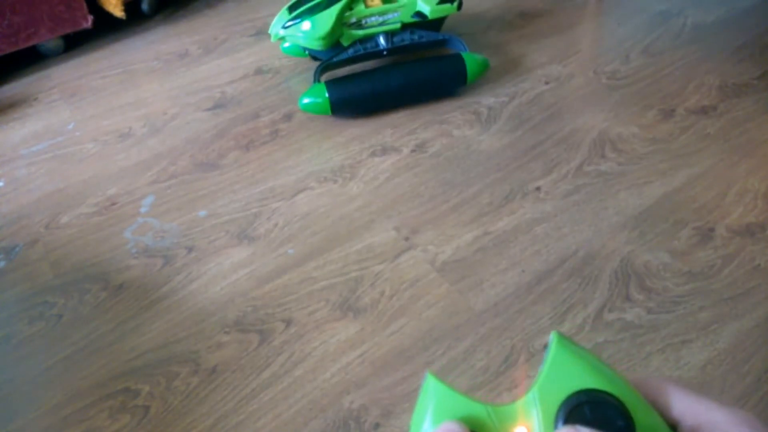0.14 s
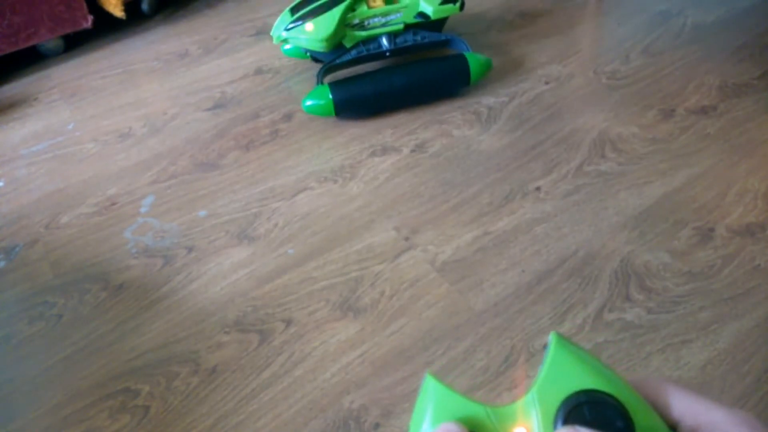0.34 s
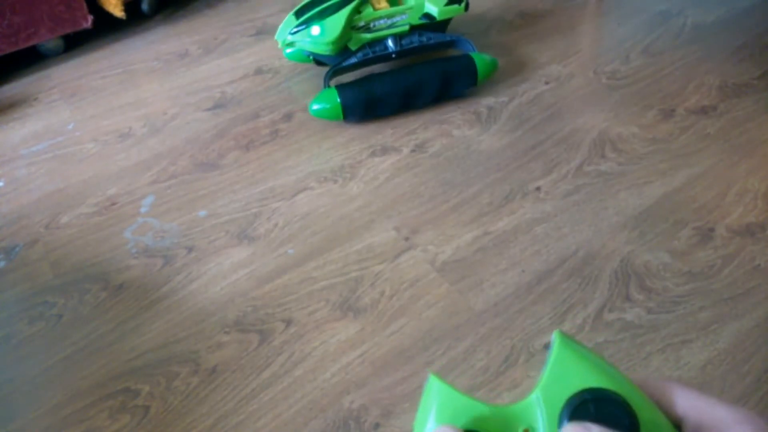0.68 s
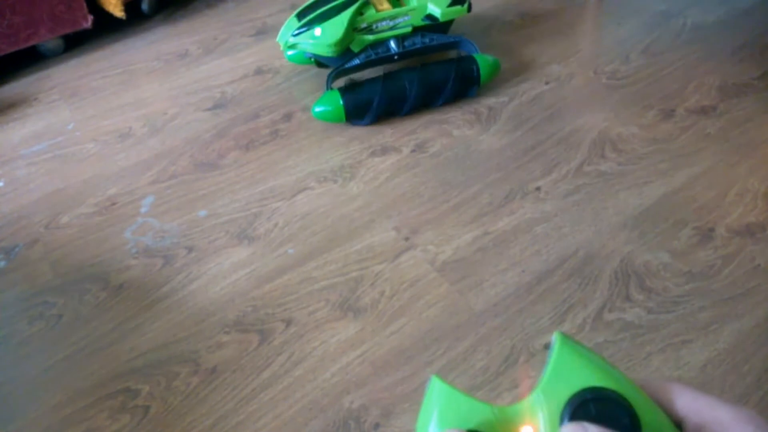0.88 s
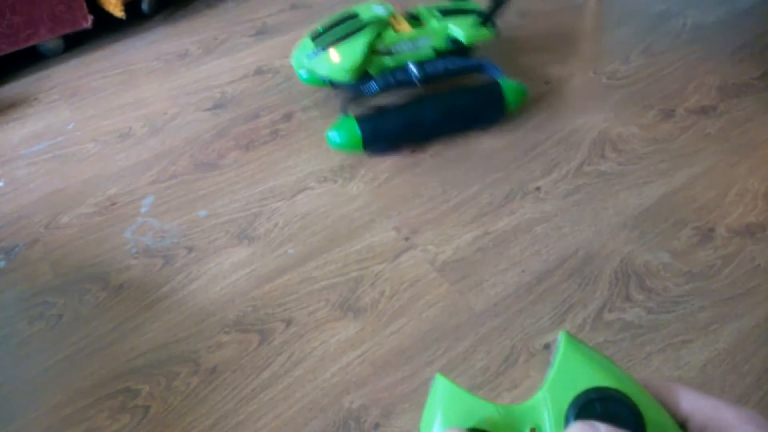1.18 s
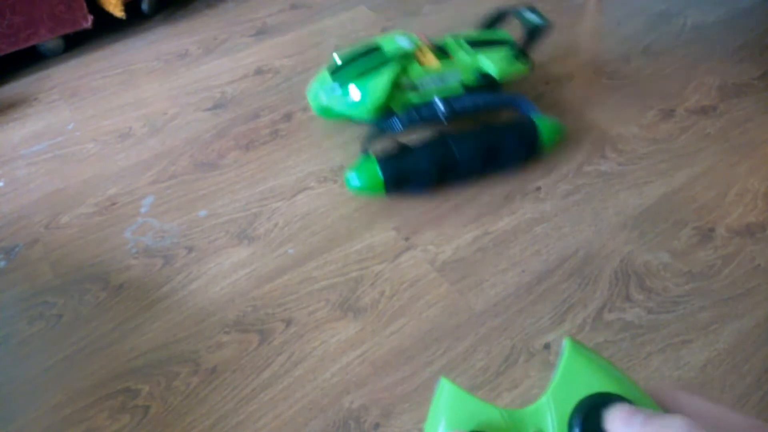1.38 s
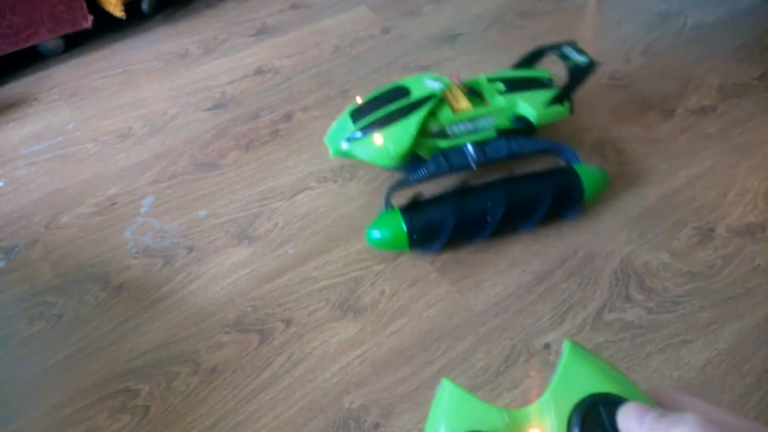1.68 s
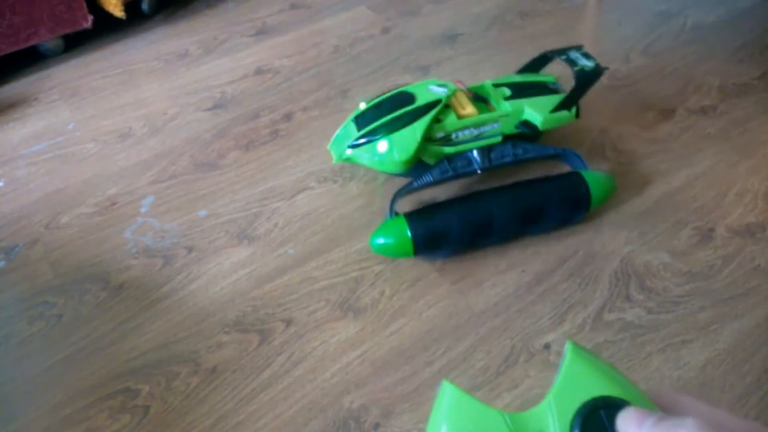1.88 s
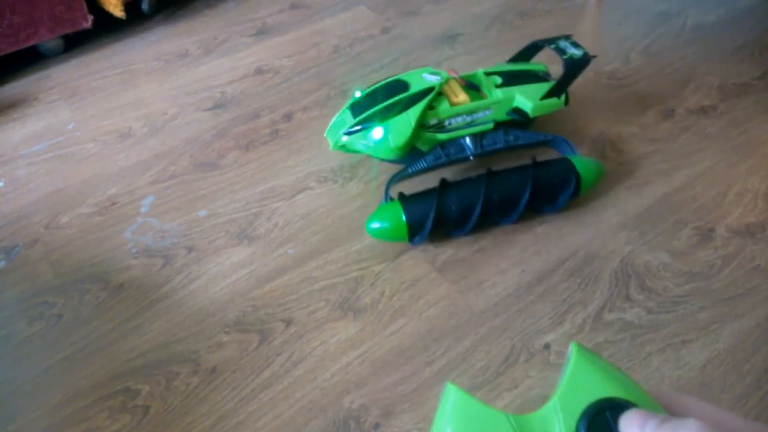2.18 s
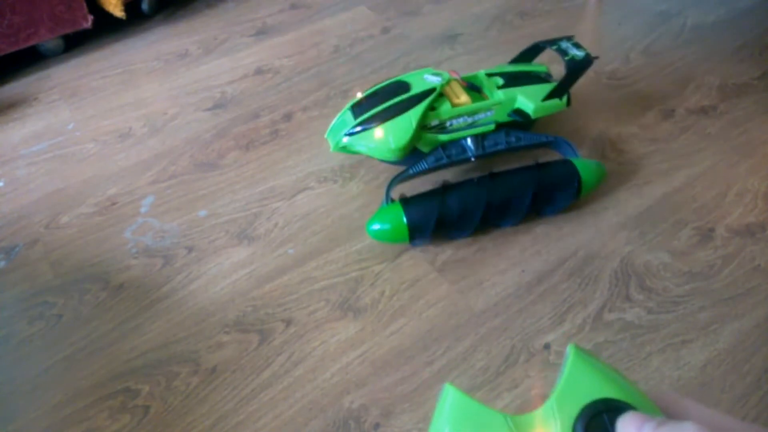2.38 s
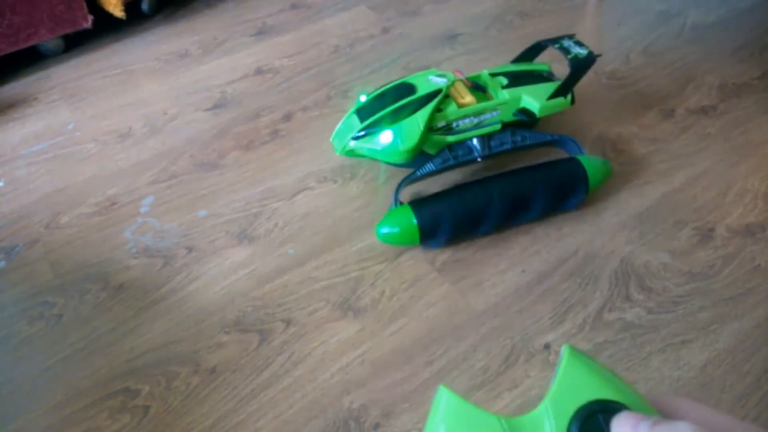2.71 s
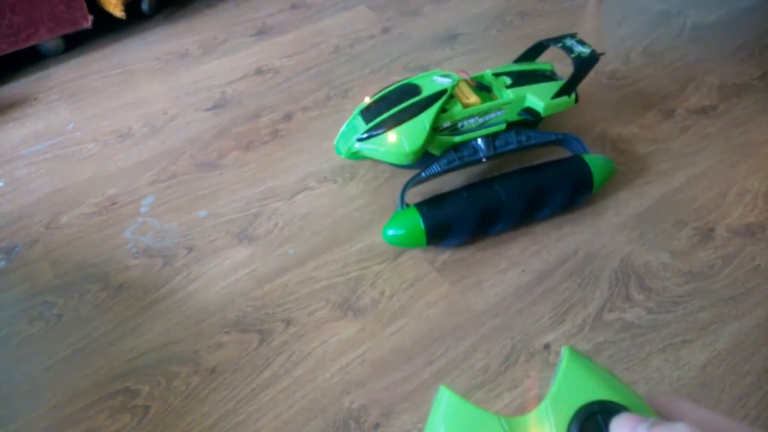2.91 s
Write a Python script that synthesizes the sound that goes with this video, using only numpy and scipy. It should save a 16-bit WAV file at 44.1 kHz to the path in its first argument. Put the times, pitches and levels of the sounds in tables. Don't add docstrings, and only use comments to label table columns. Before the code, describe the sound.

A battery toy car rattles and whirs across a wooden floor in four bursts, its hollow drums knocking the boards; loud plastic switch snaps from a hand controller sound close to the microphone in a small room.

```python
import sys
import numpy as np
from scipy import signal
from scipy.fft import rfft, irfft
from scipy.io import wavfile

SR = 44100
rng = np.random.default_rng(int(sys.argv[2]) if len(sys.argv) > 2 else 0)


def int16_out(signal):
    q = np.round(np.clip(np.atleast_2d(signal).T, -1, 1) * 32767)
    wavfile.write(sys.argv[1], SR, q.astype(np.int16))


def rack_gain(trim_db):
    fader = np.asarray(trim_db, float)
    return 10 ** (fader / 20)


N = 134505


def rms_one(x):
    return x / np.sqrt(np.mean(x ** 2) + 1e-20)


def colour(x, points):
    hz, db = np.transpose(points)
    grid = np.maximum(np.fft.rfftfreq(N, 1 / SR), 1)
    return irfft(rfft(x) * rack_gain(np.interp(np.log(grid), np.log(hz), db)), N)


def highpass(x, order, hz):
    return signal.sosfilt(signal.butter(order, hz, "high", fs=SR, output="sos"), x)


def band(x, edges_hz):
    return signal.sosfilt(signal.butter(2, edges_hz, "band", fs=SR, output="sos"), x)


def shelf(x, hz, gain_db):
    low = signal.sosfilt(signal.butter(2, hz, fs=SR, output="sos"), x)
    return low + rack_gain(gain_db) * (x - low)


def curves(rows):
    s, *controls = np.transpose(rows)
    return [np.interp(np.arange(N) / SR, s, control) for control in controls]


def drift(rate):
    r = np.exp(-2 * np.pi * rate / SR)
    walk = signal.lfilter([1], [1, -2 * r, r * r], rng.standard_normal(N + SR))[SR:]
    return 2 * np.tanh(rms_one(walk) / 2)


def impulses(seconds, heights):
    starts = np.full(N, 1e-18)
    starts[(np.array(seconds) * SR).astype(int)] = heights
    return starts


def surges(rows, fade_s):
    rise_s = 0.0025
    s, db = np.transpose(rows)
    fading = signal.lfilter([1], [1, -np.exp(-1 / (fade_s * SR))], impulses(s, db))
    rise = np.exp(-1 / (rise_s * SR))
    return signal.lfilter([1 - rise], [1, -rise], fading)


def grains(per_s, spread_db):
    size = rack_gain(spread_db * np.minimum(rng.exponential(1, N), 5)) * rng.choice([-1, 1], N)
    return rms_one(size * (rng.random(N) < per_s / SR))


def puffs(seconds, db, t60, low_hz):
    starts = impulses(seconds, rack_gain(db))
    decay = signal.lfilter([1], [1, -rack_gain(-60 / (t60 * SR))], starts)
    return highpass(decay * rng.standard_normal(N), 2, low_hz)


def resonate(x, peaks, patchy_db):
    out = 0
    for k, (hz, width_hz, db) in enumerate(peaks):
        r = np.exp(-np.pi * width_hz / SR)
        poles = [1, -2 * r * np.cos(2 * np.pi * hz / SR), r * r]
        ring = signal.lfilter([(1 - r * r) / 2, 0, (r * r - 1) / 2], poles, x)
        out = out + (-1) ** k * rack_gain(db + patchy_db * drift(15.5)) * ring
    return out


def strike(seconds, db, modes, colours_db):
    out = 0
    for (hz, level_db, t60), colour_db in zip(modes, np.transpose(colours_db)):
        clicks = impulses(seconds, rack_gain(db + level_db + colour_db) * rng.choice([-1, 1], len(db)))
        r, w = rack_gain(-60 / (t60 * SR)), 2 * np.pi * hz / SR
        out = out + signal.lfilter([0, np.sin(w)], [1, -2 * r * np.cos(w), r * r], clicks)
    return out


def room(x):
    t60_s, wall_cut_hz = 0.3, 10400
    t = np.arange(SR // 2) / SR
    tail = rng.standard_normal(len(t)) * rack_gain(-60 * t / t60_s) * (t > .004)
    tail = signal.sosfilt(signal.butter(1, wall_cut_hz, fs=SR, output="sos"), tail)
    return signal.fftconvolve(x, tail / np.sqrt(np.sum(tail ** 2)))[:N]


def shifting_room(x, count=9):
    place = np.linspace(0, count - 1, N)
    out = 0
    for k in range(count):
        nearness = np.clip(1 - abs(place - k), 0, 1)
        out = out + room(x * np.sin(np.pi / 2 * nearness))
    return out


def still_air():
    # f/Hz, level/dB
    air = [(30, -12.5), (100, -15), (300, -8), (1000, -19), (3000, -21), (5500, -24.5), (7500, -24.5),
           (16000, -20)]
    return rack_gain(-64.5 + 1.0 * drift(12)) * rms_one(colour(rng.standard_normal(N), air))


def thin_rasp():
    # t/s, f/Hz, half bandwidth/Hz, level/dB, fade/s
    rasp_settings = (0, 5050, 200, -63, 7)
    s, hz, width_hz, db, fade_s = rasp_settings
    since = np.arange(N) / SR - s
    rasp = rms_one(band(rng.standard_normal(N), [hz - width_hz, hz + width_hz]))
    fade = np.clip(since / .01, 0, 1) * np.exp(-np.maximum(since, 0) / fade_s)
    return rack_gain(db + 2.5 * drift(30)) * fade * rasp


def rough_tone(hz):
    width_hz = 110
    phase = 2 * np.pi * np.cumsum(hz) / SR
    return rms_one(drift(width_hz) * np.cos(phase) + drift(width_hz) * np.sin(phase))


def coasting():
    # t/s, low f/Hz, high f/Hz, level/dB
    glide = [(1.379, 1500, 2750, -66), (1.428, 1520, 2700, -50), (1.501, 1460, 2550, -46),
             (1.561, 1330, 2600, -45), (1.598, 1300, 2780, -51), (1.64, 1380, 2480, -49.5),
             (1.689, 1420, 2500, -42.5), (1.748, 1380, 2450, -51), (1.81, 1300, 2500, -53)]
    low_hz, high_hz, db = curves(glide)
    t = np.arange(N) / SR
    sounding = (t > glide[0][0]) * (t < glide[-1][0])
    return rack_gain(db) * sounding * (rough_tone(low_hz) + rack_gain(-6.5) * rough_tone(high_hz))


def ticks():
    # t/s, peak level/dB, low f/Hz, high f/Hz
    tick_rows = [(0.141, -19, 8500, 16000), (1.035, -20, 4800, 10500), (1.063, -16, 8500, 15000),
                 (1.217, -15, 8500, 15000), (1.305, -25, 8500, 15000), (1.518, -24, 3700, 7000),
                 (1.705, -30, 4300, 7600), (1.815, -35, 4000, 9000), (2.055, -41, 8500, 15000),
                 (2.55, -33, 8500, 15000)]
    t60_s = 0.035
    return sum(band(puffs([s], [db], t60_s, low_hz), [low_hz, high_hz]) for s, db, low_hz, high_hz in tick_rows)


def case_ring(snaps):
    # f/Hz, level/dB, t60/s
    case_modes = [(608, -6, 0.045), (1150, -6, 0.015), (1380, -10, 0.018), (1690, -2, 0.034),
                  (2310, -1.5, 0.021), (2994, 1, 0.03), (3340, -9, .025), (4090, -1.5, 0.02),
                  (4180, -1.5, 0.0079), (4950, 0.5, .025), (5850, -7, 0.01), (7000, -18, 0.035),
                  (7560, -4, 0.023), (9350, -0.5, 0.0016)]
    snap_colours = [
        [-1.5, -10, 0, 1.8, -4, 2, -3, -12, 7, -3.5, -9.5, -10, 0, 7],
        [-16, 6, -3, 1, -8, -1.5, -16, 1.5, -3, -6.5, 8.5, 4, -3, -1],
        [0.5, 6, 2, 1.5, -2, -6, 2, 1, -9, -9, 5, -1, -3, -7],
        [-1, -3, 0, 2.3, -8.5, -3, -2, 1, -1, -9.5, -3.5, -16, -1, -3],
    ]
    contacts_s = [0, 0.00118]
    second_loss_db, damp_db_per_s, damp_limit_db = 8, 5000, 25
    hits = [(s + gap, db - second_loss_db * k - 10.0)
            for s, db, free_s in snaps for k, gap in enumerate(contacts_s)]
    hit_s, hit_db = np.transpose(hits)
    ring = strike(hit_s, hit_db, case_modes, np.repeat(snap_colours, len(contacts_s), axis=0))
    t = np.arange(N) / SR
    start_s, _, free_s = np.transpose(snaps)
    last = np.maximum(np.searchsorted(start_s, t) - 1, 0)
    since_damped = t - start_s[last] - free_s[last]
    return rack_gain(-np.clip(since_damped * damp_db_per_s, 0, damp_limit_db)) * ring


def controller():
    # t/s, peak level/dB, free ring/s
    snaps = [
        (0.9912, -10, 0.0051),
        (1.732, -15, 0.003),
        (2.498, -9, 0.0045),
        (3.0215, -8.5, 0.0049),
    ]
    cracks_db = [-17, -22, -18, -16.5]
    crack = puffs(np.array(snaps)[:, 0], cracks_db, t60=0.015, low_hz=700)
    return highpass([case_ring(snaps), ticks() + crack], 4, 430)


def floor_rumble():
    # f/Hz, level/dB
    rumble = [(20, -8), (45, -22.5), (100, -9.5), (130, -4), (220, 7), (400, -52.5)]
    return rms_one(colour(rng.standard_normal(N), rumble)) * rack_gain(0.7 * drift(5.6))


def thread_knocks(speed, throb_db):
    # t/s, lift (negative: dip)/dB
    thumps = [(0.238, 6.5), (0.298, 17.5), (0.55, 4), (1.038, 0.5), (1.051, 3), (1.207, 10), (1.61, 1.5),
              (1.822, -7.5), (1.861, -2), (1.903, 3.5), (2.538, -4.5), (2.558, 5), (2.591, 7.5),
              (2.658, 1.5), (2.727, 2), (2.775, 3), (2.89, 15.5), (2.92, -3)]
    knocks = grains(1500 * speed, spread_db=1) / np.sqrt(speed)
    return knocks * rack_gain(0.94 * drift(44) + throb_db + surges(thumps, fade_s=0.0067))


def boards(knocks):
    # f/Hz, bandwidth/Hz, level/dB
    board_modes = [(264.3, 30, 3), (346.6, 73, 2.5), (425, 63.4, 7.5), (453.6, 170, 1.5)]
    return rms_one(highpass(resonate(knocks, board_modes, patchy_db=0.5), 6, 255))


def drums(knocks):
    # f/Hz, bandwidth/Hz, level/dB
    drum_modes = [(620.4, 92.4, 2.5), (668, 119, 2.5), (785, 129, 1), (936, 252, -2.5), (1088, 112, -1.5),
                  (1268, 266, -5), (1415, 274, -10.5), (2530, 62, -16.5)]
    return rms_one(highpass(resonate(knocks, drum_modes, patchy_db=2.0), 4, 450))


def gear_rattle(speed, throb_db, middle_db, sheen_db):
    # f/Hz, level/dB
    tooth_spectrum = [(900, -25.5), (1400, -8.5), (1750, -7), (2500, -0.5), (3300, -5.5), (4400, -9),
                      (5200, -6.5), (16000, -13)]
    # f/Hz, bandwidth/Hz, level/dB
    shell_modes = [(1534, 70, -6), (2500, 150, 0.5), (3394, 140, -9), (5410, 33, -20), (7000, 81, -19.5),
                   (13300, 1200, -7)]
    # t/s, lift (negative: dip)/dB
    jolts = [(0.051, -4), (0.139, 2), (0.157, 0), (0.221, 7.5), (0.237, -5), (0.284, 6), (0.302, 2),
             (0.348, 0.5), (0.556, 2.5), (0.602, -1), (0.653, 8.5), (0.731, 1.5), (1.13, -6), (1.165, 5),
             (1.25, 5), (1.518, -3), (1.663, 13.5), (1.704, 4), (1.815, -8), (1.833, -5), (1.924, 8.5),
             (2.055, 3), (2.552, 6.5), (2.583, 4), (2.603, 2.5), (2.69, 7), (2.755, 5), (2.855, 4),
             (2.925, 8.5)]
    teeth = rms_one(colour(grains(5000, spread_db=2), tooth_spectrum))
    teeth = teeth * rack_gain(1.43 * drift(44) + throb_db + surges(jolts, fade_s=0.0082))
    shell_db = -2 + 7 * (1.5 - speed)
    gears = rms_one(teeth + rack_gain(shell_db) * resonate(teeth, shell_modes, patchy_db=2.5))
    gears = shelf(gears, 3000, -5 * (1 - speed))
    gears = shelf(gears, 8400, -4 * (1 - speed))
    middle = (rack_gain(middle_db) - 1) * band(gears, [1250, 3900])
    sheen = rack_gain(sheen_db) * speed * band(gears, [12900, 14000])
    return gears + middle + sheen


def car():
    # t/s, gear level/dB, board grip level/dB, drum boom level/dB
    drive = [
        [(0, -26.5, -1.5, -0.5), (.3, -25.5, -5, -2.5), (.58, -24.5, -2.5, -0.5), (0.711, -26, 0, 0),
         (0.861, -33.5, -6.5, -2.5), (0.969, -56, -14, -6)],
        [(1.0, -48, -17, 1), (1.04, -34, -6.5, -3.5), (1.06, -29.5, 2, 6), (1.12, -25, -4, -1.5),
         (1.3, -25, 3, 0), (1.42, -33.5, 4, 0.5), (1.6, -40.5, 4.5, 1), (1.8, -48, 2.5, 7)],
        [(1.825, -31, 8.5, 1), (1.88, -25.5, 1, 1.5), (1.95, -26.5, 9, 1.5), (2.07, -32.5, 0.5, -0.5),
         (2.16, -51, 2, 3), (2.25, -64.5, 10.5, 3), (2.33, -79, 6, 1.5)],
        [(2.5, -67.5, -6, 3), (2.52, -39.5, -11, -3.5), (2.55, -32, 2, 1.5), (2.58, -29.5, 6.5, -1),
         (2.61, -25, 2, -0.5), (2.76, -23.5, 6.5, 0.5), (2.85, -28, 1.5, 2.5), (2.93, -36, 5, -8),
         (3.019, -54.5, 1, 6)],
    ]
    # t/s, middle level/dB, sheen level/dB, rumble level/dB
    facing = [(0, 0.9, -9, 1), (.4, -0.5, -9, -9), (.8, -1.1, -9, -5.5), (1.1, 0, -13, 0.8),
              (1.35, -3, -14, -0.5), (1.7, 1, -9, 4.5), (1.95, -0.5, 3, 1.5), (2.3, 0.5, 1.5, 7),
              (2.65, -0.5, 9, -0.5), (2.9, -1.5, 3, -0.5)]
    gear_db, grip_db, boom_db = curves(np.vstack(drive))
    middle_db, sheen_db, rumble_db = curves(facing)
    speed = np.clip(rack_gain(0.614 * (gear_db - gear_db.max() + 3.5)), .15, 1)
    turns_per_s = 15.5 * speed * (1 + 0.1546 * drift(1.67))
    throb_db = 0.1 * np.cos(2 * np.pi * np.cumsum(turns_per_s) / SR)
    gears = gear_rattle(speed, throb_db, middle_db, sheen_db)
    knocks = thread_knocks(speed, throb_db)
    floor = rack_gain(-3.5) * boards(knocks) + rack_gain(-20 + rumble_db) * floor_rumble()
    return rack_gain(gear_db) * (gears + rack_gain(grip_db) * floor + rack_gain(-2 + boom_db) * drums(knocks))


def scene():
    toy = car() + coasting() + thin_rasp()
    ring, crack = controller()
    snap_echo = rack_gain(-13) * ring + crack
    wet = shifting_room(rack_gain(-11.5) * toy + rack_gain(-7) * snap_echo)
    return (toy + ring + crack + wet + still_air())[None]


def low_pass(x):
    return signal.sosfilt(signal.butter(12, 15750, fs=SR, output="sos"), x)


def record(dry):
    # f/Hz, level/dB
    mic = [(6000, 4.5), (7200, 2), (8100, -12), (9300, -13), (10300, -18.5), (13000, -21.5), (15800, -28.5)]
    rounded = 0.65 * np.tanh(colour(dry[0], mic)[None] / 0.73)
    heard = rounded + rack_gain(-78) * rng.standard_normal(N)
    return low_pass(heard)


dry = scene()
out = record(dry)
int16_out(out)
```